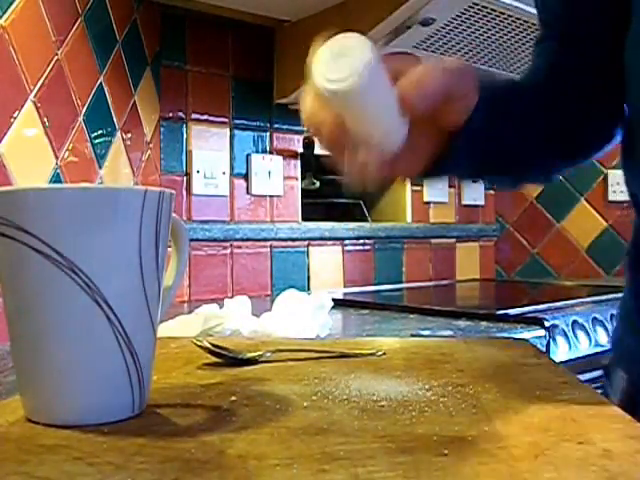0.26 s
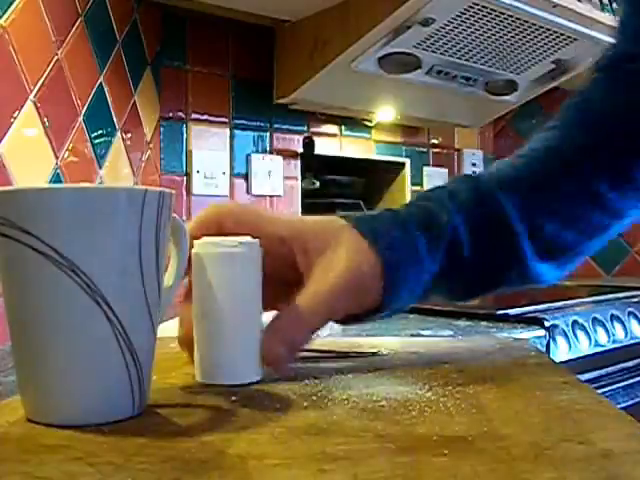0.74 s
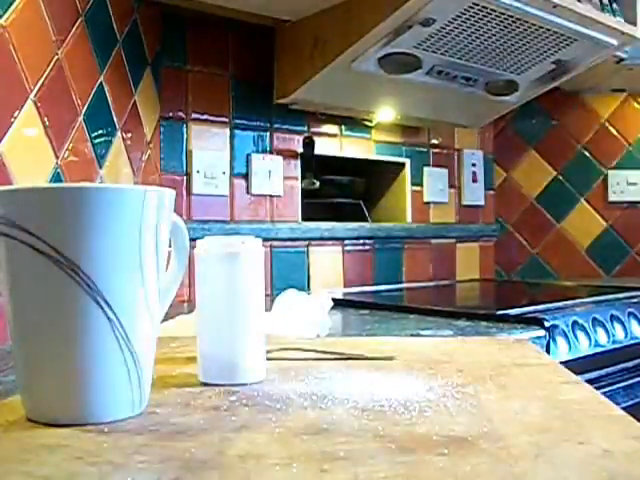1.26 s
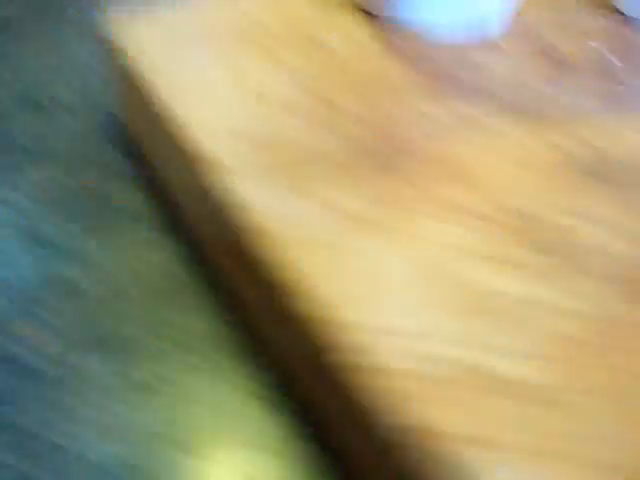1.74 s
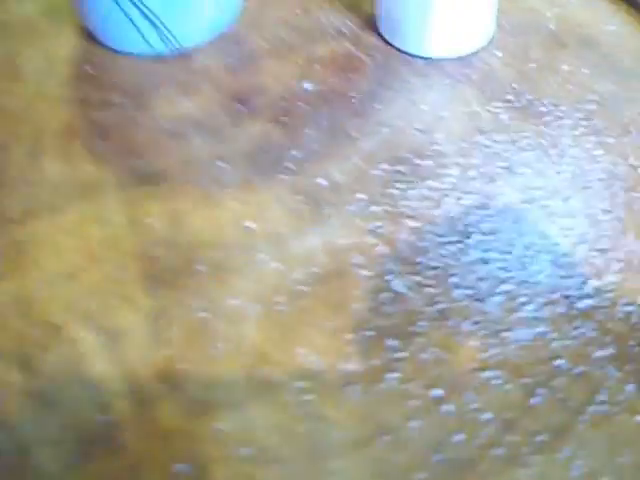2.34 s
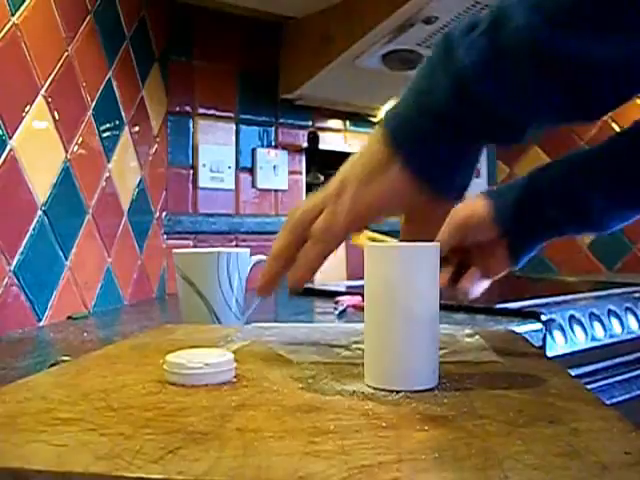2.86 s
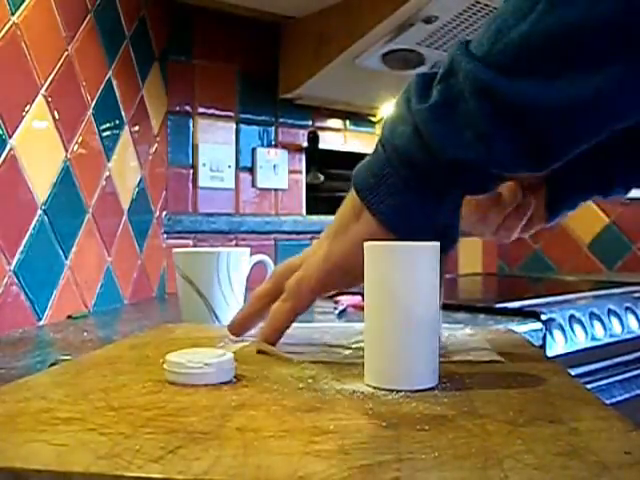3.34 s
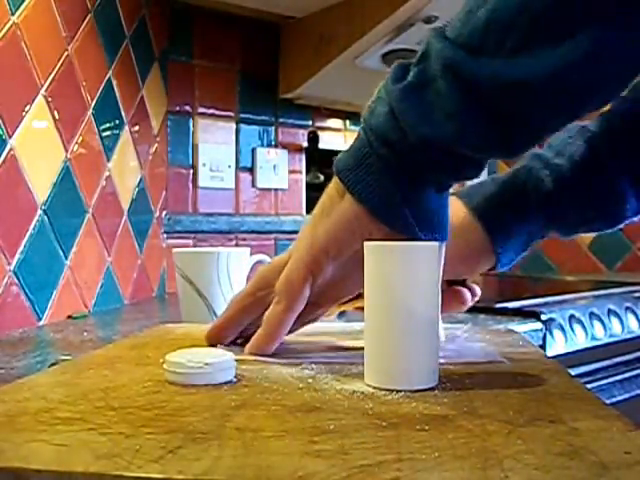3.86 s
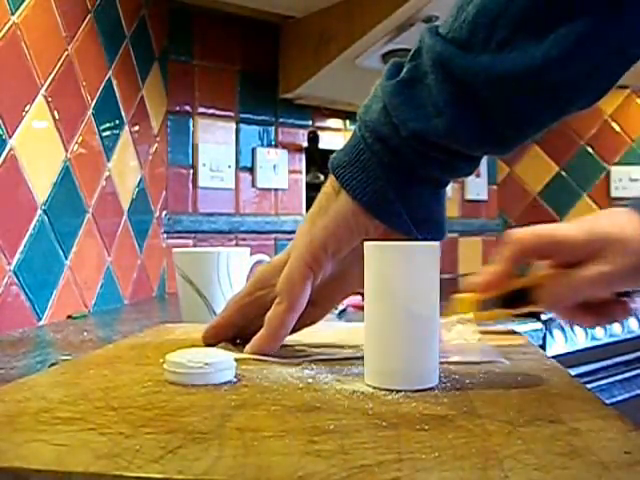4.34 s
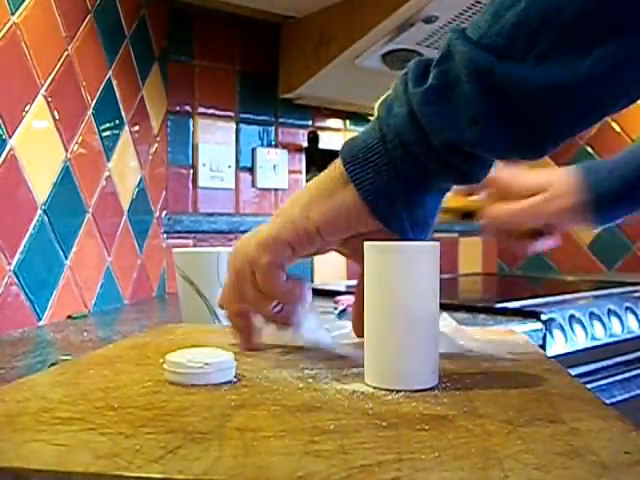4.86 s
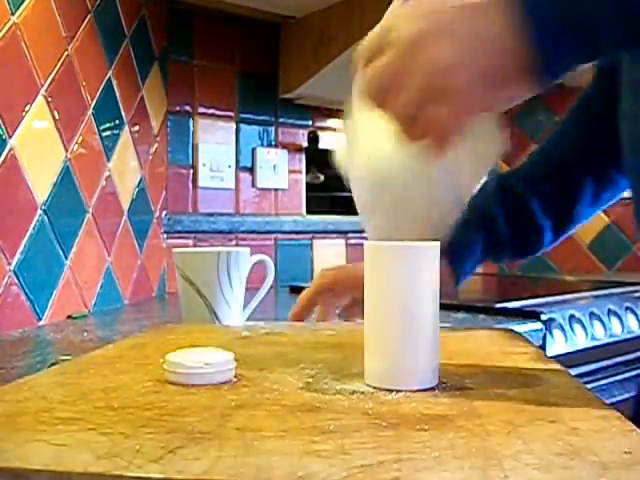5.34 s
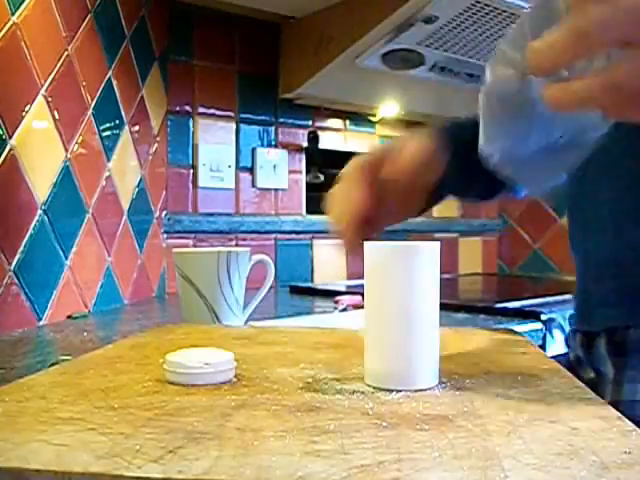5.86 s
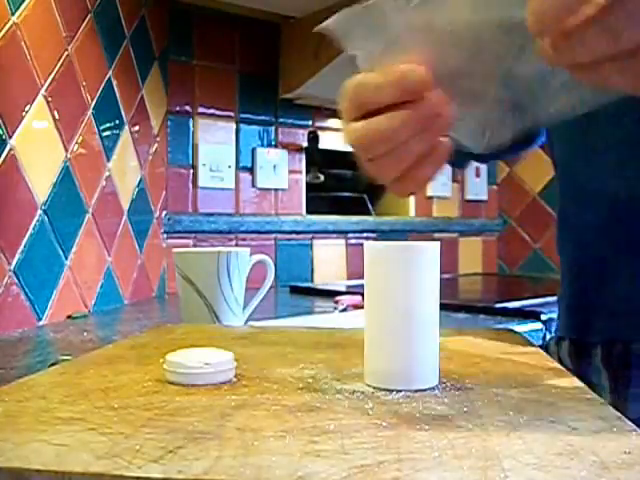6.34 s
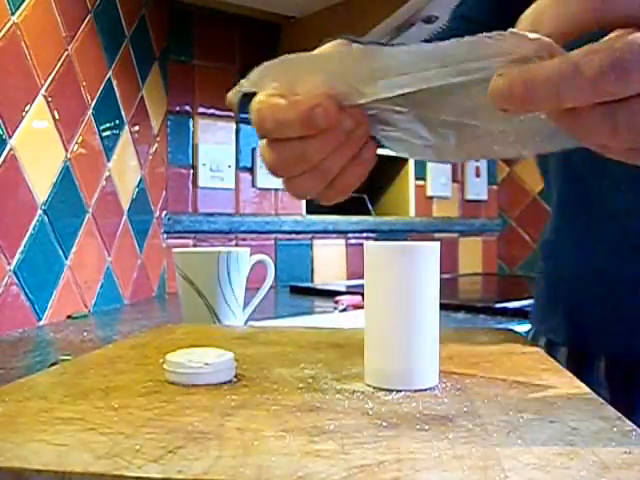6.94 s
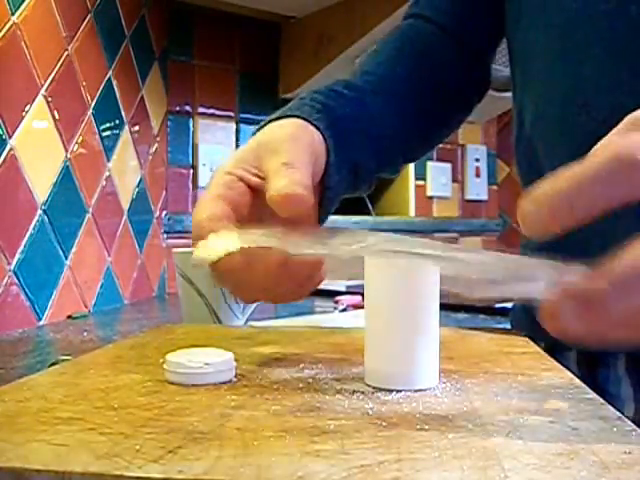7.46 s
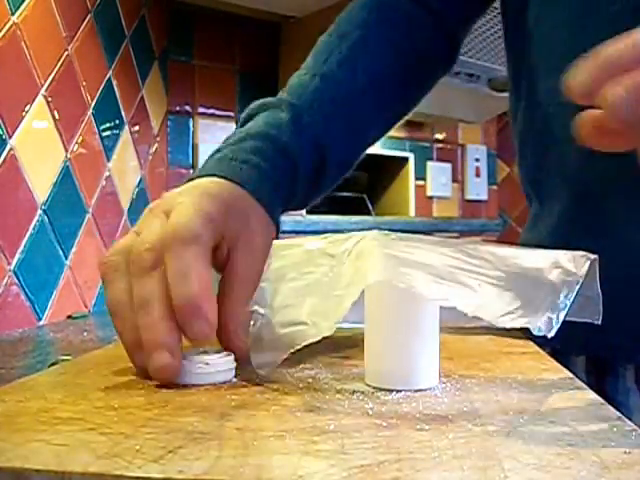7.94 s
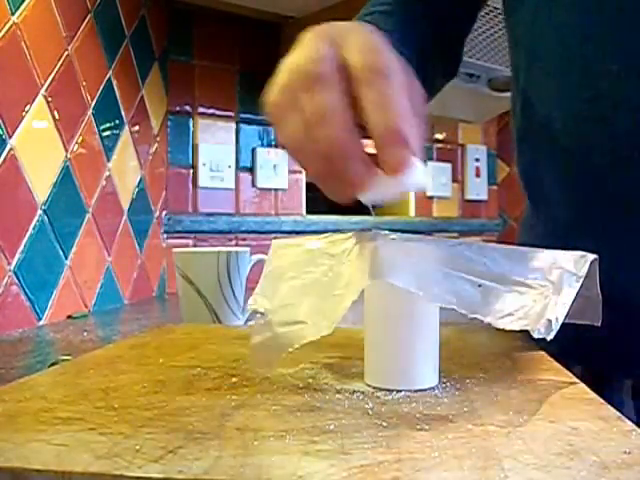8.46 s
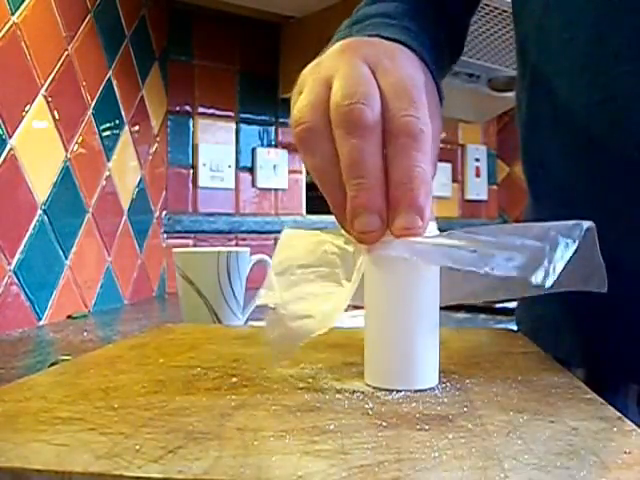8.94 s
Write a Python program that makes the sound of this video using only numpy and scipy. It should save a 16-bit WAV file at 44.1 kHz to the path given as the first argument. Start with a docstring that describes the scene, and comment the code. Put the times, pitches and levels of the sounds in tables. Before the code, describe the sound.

Shaker hiss and knock, creaky handling bumps, ratcheting blade snaps, a gritty slice, a knife clatter, crackling plastic film and a squeaky lid in a tiled kitchen.

```python
"""Cling film crackles, tears off a wooden board and flaps as it is draped over a salt shaker in a tiled kitchen.
Before that, salt slides in the shaker as tiny clicks, the shaker knocks on the ringing board, and a camera case
creaks as it is picked up. After a short silence, a second scene starts: a craft knife ratchets open with ringing
snaps, slices the film with a gritty hiss, and drops on the worktop. The film is peeled up in small slips and tugs
and draped, then a hollow lid scrapes and squeaks off the board and is pressed on. Room noise runs underneath."""
import sys
import numpy as np
from scipy import signal
from scipy.fft import rfft, irfft
from scipy.io import wavfile
from scipy.ndimage import uniform_filter1d

SR = 44100
rng = np.random.default_rng(int(sys.argv[2]) if len(sys.argv) > 2 else 0)


def waveform_to_disk(signal):
    """Save audio, clipped to [-1, 1], as 16-bit WAV at the path in sys.argv[1]."""
    frames = np.transpose(np.atleast_2d(signal))
    scaled = np.clip(frames, -1, 1) * 32767
    samples = np.round(scaled).astype(np.int16)
    wavfile.write(sys.argv[1], SR, samples)


N = 405279
TIME = np.arange(N) / SR   # seconds
SILENCE_START_S, SILENCE_END_S = 2.904, 2.921   # the gap between the two scenes


def from_db(db):
    """Turn decibels into a plain multiplier."""
    return 10 ** (np.asarray(db) / 20)


def unit_power(x):
    """Scale a signal so that its average power is 1."""
    return x / np.sqrt(np.mean(x ** 2) + 1e-20)


def level_curves(rows):
    """Join the rows into one gain curve per dB column, fading to near silence outside them."""
    start, *columns = np.transpose(rows)
    edged = np.r_[start[0] - .03, start, start[-1] + .03]
    curves = []
    for column in columns:
        db = np.interp(TIME, edged, np.r_[-100, column, -100])
        curves.append(from_db(db))
    return curves


def drift(rate):
    """Wander smoothly and randomly, with new targets "rate" times a second and unit power."""
    targets = rng.standard_normal(8192)
    return unit_power(np.interp(TIME * rate, np.arange(len(targets)), targets))


def colour(x, points, size=4096):
    """Filter a sound to a given spectrum, adding no sound before its cause (minimum phase)."""
    hz, db = np.transpose(points)
    grid = np.maximum(np.arange(size // 2 + 1) * SR / size, 1)
    spectrum_db = np.interp(np.log(grid), np.log(hz), db)
    # folding the cepstrum forward in time makes the filter minimum-phase
    cepstrum = irfft(np.log(from_db(spectrum_db)))
    cepstrum[1:size // 2] *= 2
    cepstrum[size // 2 + 1:] = 0
    response = irfft(np.exp(rfft(cepstrum)))
    # unit power gain: only the shape of the spectrum matters, not its height
    return signal.oaconvolve(x, response / np.linalg.norm(response))[:N]


def resonate(x, modes):
    """Ring side-by-side resonances; a narrower width rings longer."""
    out = 0
    for hz, width, db in modes:
        r = np.exp(-np.pi * width / SR)
        feedback = [1, -2 * r * np.cos(2 * np.pi * hz / SR), r * r]
        ring = signal.lfilter([1, 0, -1], feedback, x + 1e-18)
        out = out + from_db(db) * (1 - r * r) / 2 * ring   # the dB is the gain on top
    return out


def grains(per_s, spread_db, clump_db, clump_rate):
    """Scatter tiny clicks of uneven size that come in clumps, with unit power."""
    sizes = from_db(spread_db * np.minimum(rng.exponential(1, N), 4)) * rng.choice([-1, 1], N)
    clicks = sizes * (rng.random(N) < per_s / SR)
    return unit_power(clicks * from_db(clump_db * drift(clump_rate)))


def contacts(rows, rise_s):
    """Make each contact a brief noisy chatter of micro-impacts that dies away."""
    force, t = np.zeros(N), TIME[:SR // 8]
    for start, db, decay in rows:
        shape = (1 - np.exp(-t / rise_s)) ** 2 * np.exp(-t / max(decay, 1e-4))
        at = round(start * SR)
        force[at:at + len(t)] += (from_db(db) * shape / shape.max())[:N - at]
    return force * rng.standard_normal(N)


def alike(rows, decay_s):
    """Give contacts of one kind the same decay time."""
    return [(start, db, decay_s) for start, db, *_ in rows]


def strokes(rows, attack_s, release_s):
    """Let each movement swell, hold and die away; one gain curve per dB column."""
    power = 0
    for start, hold, *levels in rows:
        before = np.maximum(start - TIME, 0) / attack_s
        after = np.maximum(TIME - start - hold, 0) / release_s
        shape = np.exp(-2 * np.minimum(before + after, 20))
        power = power + np.outer(from_db(levels) ** 2, shape)
    return np.sqrt(power)


# Steady kitchen air. Each row: time in seconds, level in dB.
AIR_LEVELS = [(0, -49.5), (2.9, -52.5), (2.93, -49.5), (9.19, -50.5)]
# Tone of that air. Each row: frequency in Hz, relative level in dB per Hz.
AIR_COLOUR = [(25, -1.5), (100, 2), (240, 2.5), (330, -0.5), (440, 3), (600, -5), (1000, -8), (3000, -11),
              (8000, -17.5), (15000, -17.5)]
# Faint electrical whine. Each row: pitch in Hz, level in dB.
WHINE_TONES = [(5362, -65.5), (5674, -66)]


def background():
    """Filtered noise makes the kitchen air; steady sine tones make a thin whine in the second scene."""
    level, = level_curves(AIR_LEVELS)
    whine = 0
    for hz, db in WHINE_TONES:
        whine = whine + from_db(db) * np.sqrt(2) * np.sin(2 * np.pi * hz * TIME)
    air = level * colour(rng.standard_normal(N), AIR_COLOUR)
    return air + whine * (TIME > SILENCE_END_S)


# Shaker strokes with salt sliding inside. Each row: start in seconds, hold in seconds, relative level in dB.
SALT_STROKES = [(.025, 0.013, -40.5), (.168, 0.017, -42), (.316, 0.028, -48), (.45, 0.17, -52),
                (.548, 0.025, -42.5)]
# Tone of salt on plastic. Each row: frequency in Hz, relative level in dB per Hz.
SALT_TONE = [(300, -20), (1000, -17), (2000, -8), (3000, 0), (4000, 0), (7000, -4.5), (9000, -14),
             (15000, -15.5)]


def shaker():
    """Salt slides along the plastic wall on every stroke, as a dense stream of tiny clicks."""
    stroke, = strokes(SALT_STROKES, attack_s=0.012, release_s=0.01)
    salt = stroke * grains(per_s=9000, spread_db=2.0, clump_db=1.5, clump_rate=29)
    return from_db(8) * colour(salt, SALT_TONE)


# Shaker knocking on the board, a ratchet jolt, then the knife dropping on the worktop.
# Each row: start in seconds, relative peak in dB, decay in seconds.
HARD_KNOCKS = [(.8812, -9.5, 0.0041), (.897, -17.5, 0.0035), (3.3455, -9.5, 0.0019), (5.204, -0.5, 0.0069)]
# Shaker settling and sliding. Each row: start in seconds, hold in seconds, relative level in dB.
SHAKER_SLIDES = [(.935, 0.05, -43), (.995, 0.027, -36)]
# Fingers and lid tapping the board. Each row: start in seconds, relative peak in dB.
BOARD_TAPS = [(7.998, -26), (8.055, -34), (8.148, -23), (8.237, -31.5), (8.442, -20)]
# Tone of hard knocks. Each row: frequency in Hz, relative level in dB per Hz.
HARD_KNOCK_COLOUR = [(40, -4.5), (105, -13.5), (190, -4.5), (700, 0.5), (1300, -3.5), (3200, -3),
                     (7000, -11.5), (15000, -12)]
# Tone of soft taps. Each row: frequency in Hz, relative level in dB per Hz.
SOFT_TAP_COLOUR = [(40, -7), (110, 4.5), (190, 8), (450, -7.5), (900, -9), (3000, -21.5), (8000, -27),
                   (15000, -24)]
# Body resonances shared by knocks and taps. Each row: frequency in Hz, width in Hz, relative level in dB.
BODY_MODES = [(60.4, 7.6, 20.5), (158.5, 21, 7.5), (290, 24, -1), (368, 16, 8), (468, 8.3, 13),
              (598, 31, -3.5), (734, 28, 1), (1030, 31, 3)]


def knocks_and_taps():
    """Hard knocks, a short scrape and soft taps share one set of body resonances."""
    slide, = strokes(SHAKER_SLIDES, attack_s=.012, release_s=0.019)
    judder = grains(per_s=1200, spread_db=3, clump_db=2, clump_rate=80)
    hits = from_db(-4.0) * contacts(HARD_KNOCKS, rise_s=0.0013)
    knocks = colour(hits + from_db(0.5) * slide * judder, HARD_KNOCK_COLOUR)
    tap_force = contacts(alike(BOARD_TAPS, decay_s=0.0051), rise_s=0.0013)
    taps = from_db(-11.5) * colour(tap_force, SOFT_TAP_COLOUR)
    return knocks + taps + from_db(-3.5) * resonate(knocks + taps, BODY_MODES)


# Soft, low thuds of camera and board. Each row: start in seconds, relative peak in dB, decay in seconds.
LOW_THUDS = [(.886, -34, 0.048), (1.448, -23, 0.011), (1.525, -22, 0.031), (1.636, -20, 0.0091),
             (1.715, -34.5, 0.064), (5.503, -26, 0.0083), (5.770, -28, 0.017)]
# Tone of the thuds. Each row: frequency in Hz, relative level in dB per Hz.
LOW_THUD_COLOUR = [(20, -2), (40, -12), (65, 3), (100, -23), (200, -18), (600, -26)]


def thuds():
    """Slow pushes reach the microphone through solid material, so mostly low tones are left."""
    return from_db(-5.0) * colour(contacts(LOW_THUDS, rise_s=0.0016), LOW_THUD_COLOUR)


# Fingers rubbing the camera case. Each row: start in seconds, hold in seconds, relative rub level in dB,
# relative level driving the case's ring in dB.
CASE_RUBS = [(1.07, .26, -49.5, -53), (1.17, 0.082, -44, -49), (1.36, 0.011, -35, -48),
             (1.45, .03, -51, -46), (1.495, 0.041, -28, -23.5), (1.56, 0.036, -41, -51),
             (1.63, 0.032, -21.5, -25.5), (1.68, 0.2, -41.5, -45), (1.992, 0.08, -33.5, -34),
             (2.15, .07, -45, -50)]
# Creaks of the case. Each row: start in seconds, relative peak in dB, ring in dB relative to the creak.
CASE_CREAKS = [(1.3452, -5, -3.5), (1.3856, -9.5, -10), (1.4345, -6, -9), (1.49, -8, -4.5),
               (1.5326, -8.5, -7), (1.6314, -15.5, -5), (1.657, -14.5, -1), (1.8538, -19.5, -1.5),
               (1.9349, -25.5, 12), (2.214, -36, -10), (2.2752, -28.5, -0.5), (2.299, -40, -6),
               (2.419, -43.5, -5), (2.507, -47, -6), (2.859, -23.5, -9)]
# Palm bumping the camera. Each row: start in seconds, relative peak in dB.
PALM_BUMPS = [(1.3425, -8.5), (1.3865, -30), (1.435, -24), (1.4875, -12), (1.501, -10.5), (1.512, -11.5),
              (1.529, -11), (1.550, -25.5), (1.581, -18)]
# The camera is heaved up and its body rumbles. Each row: start in seconds, hold in seconds, relative level in dB.
CAMERA_HEAVE = [(1.495, 0.032, -21)]
# Tone of rubs and creaks. Each row: frequency in Hz, relative level in dB per Hz.
RUB_COLOUR = [(200, -18.5), (600, -5.5), (1100, 2), (1800, 1), (2850, 1), (3400, 6), (4200, 7), (6500, 1),
              (8300, 0.5), (15000, -6.5)]
# Resonances of the case. Each row: frequency in Hz, width in Hz, gain in dB.
CASE_RESONANCES = [(2780, 295, 11.5), (2740, 100, 6), (1020, 110, -50)]
# Tone of bumps on the camera. Each row: frequency in Hz, relative level in dB per Hz.
BUMP_COLOUR = [(25, -9), (60, -9), (130, 0), (200, 1), (300, 0.5), (450, 3), (650, -7), (1100, -6.5),
               (2000, -21)]


def camera():
    """Fingers rub and creak on the ringing case, which carries bumps straight to the microphone."""
    rumble, = strokes(CAMERA_HEAVE, attack_s=0.043, release_s=0.021)
    rub, ring_drive = strokes(CASE_RUBS, attack_s=0.019, release_s=0.017)
    friction = grains(per_s=1800, spread_db=3.2, clump_db=2, clump_rate=140)
    creaks = from_db(0.5) * contacts(alike(CASE_CREAKS, decay_s=0.0028), rise_s=0.00038)
    ring_rows = [(start, db + ring_db) for start, db, ring_db in CASE_CREAKS]
    ring_hits = from_db(8.5) * contacts(alike(ring_rows, decay_s=0.0018), rise_s=0.00022)
    body = contacts(alike(PALM_BUMPS, decay_s=0.0059), rise_s=0.00058) + rumble * friction
    surface = colour(creaks + rub * friction, RUB_COLOUR)
    ringing = resonate(ring_hits + ring_drive * friction, CASE_RESONANCES)
    return surface + ringing + colour(body, BUMP_COLOUR)


# The film is smoothed, lifted, stretched and draped. Each row: start in seconds, hold in seconds,
# relative rustle level in dB, relative flapping level in dB.
FILM_HANDLING = [(2.94, 0.068, -53, -67), (3.11, 0.068, -37, -53.5), (3.86, 0.058, -48, -48),
                 (4.78, 0.26, -42.5, -65), (4.92, 0.092, -37, -61), (5.05, 0.12, -40.5, -54.5),
                 (6.09, 0.068, -42.5, -66), (6.165, 0.025, -50, -45.5), (6.25, 0.024, -41, -57),
                 (6.32, 0.021, -30, -39.5), (6.365, 0.14, -36.5, -50.5), (6.53, .16, -42.5, -56),
                 (6.74, 0.15, -45, -55), (6.96, 0.026, -43, -40), (7.03, 0.15, -51.5, -60),
                 (7.2, .08, -45, -54.5), (7.32, .15, -48, -64), (7.5, 0.21, -51.5, -54),
                 (8.23, 0.014, -39.5, -44.5), (8.79, 0.21, -53, -54), (8.85, 0.0072, -35.5, -52),
                 (8.99, 0.038, -36.5, -52), (9.07, 0.033, -48.5, -51)]
# Creases snapping. Each row: start in seconds, relative peak in dB.
CREASE_SNAPS = [(4.2209, -13.5), (4.2973, -3.5), (4.3664, -16), (4.5874, -8), (4.9886, -35), (5.7703, -19),
                (6.0561, -23.5), (6.3265, -9), (6.4764, -16), (6.6094, -23.5), (7.953, -37), (8.6375, -37),
                (8.9319, -23), (9.1723, -30)]
# Tone of crackling film, also used in peeling. Each row: frequency in Hz, relative level in dB per Hz.
CRACKLE_COLOUR = [(400, -14.5), (1000, -5.5), (2000, -0.5), (3200, 4.5), (4400, 4), (7000, -0.5),
                  (9000, -8.5), (15000, -10)]
# Tone of flapping film, also used in peeling. Each row: frequency in Hz, relative level in dB per Hz.
FLAPPING_COLOUR = [(30, -54.5), (90, -7.5), (175, 6), (330, 5.5), (480, -5), (800, -5.5), (2000, -12.5)]


def film():
    """Thin film crackles in tiny clicks, snaps at its creases and flaps as it is moved."""
    rustle, flap = strokes(FILM_HANDLING, attack_s=0.021, release_s=0.018)
    crackle = rustle * grains(per_s=3200, spread_db=4.4, clump_db=1.4, clump_rate=110)
    flapping = flap * grains(per_s=2500, spread_db=2, clump_db=1, clump_rate=50)
    snaps = contacts(alike(CREASE_SNAPS, decay_s=.0035), rise_s=0.0002)
    bright = colour(from_db(-1.5) * crackle + from_db(-9.0) * snaps, CRACKLE_COLOUR)
    return bright + from_db(2) * colour(flapping, FLAPPING_COLOUR)


# Slider jumping its notches. Each row: start in seconds, relative level in dB.
NOTCH_SNAPS = [(3.2705, -19.5), (3.3465, 2.5), (3.3555, -2.5), (3.388, 2), (3.4255, 7.5), (3.454, 4),
               (3.4772, 4), (3.5005, 2.5), (3.5222, 4), (3.547, 3.5), (3.5935, 8), (3.938, -21)]
# Knife lifting off the board, then clattering down. Each row: start in seconds, relative level in dB,
# chatter decay in seconds.
KNIFE_CLATTER = [(4.7208, -15, 0.0087), (5.188, 2, 0.015), (5.204, 3.5, 0.016)]
# Tone of the snaps. Each row: frequency in Hz, relative level in dB per Hz.
SNAP_COLOUR = [(100, -27.5), (900, -25), (1400, -9), (2000, 1), (3100, 2.5), (5000, -1.5), (8000, -2),
               (10000, -26), (14000, -3), (16000, -15.5)]
# Resonances of the blade. Each row: frequency in Hz, width in Hz, relative level in dB.
BLADE_MODES = [(2276, 180, -5), (2815, 180, -3), (3180, 170, -2), (4130, 550, -11.5), (7950, 94, 1),
               (8740, 170, 8.5)]
# Resonances of the hollow plastic handle. Each row: frequency in Hz, width in Hz, relative level in dB.
HANDLE_RESONANCES = [(2010, 40, -4), (2330, 140, -3)]
MODE_SCATTER_DB = 3   # spread of the drive to each blade mode, so every snap rings differently


def knife():
    """Snaps and clatter excite the blade's modes in varying strengths, and ring the hollow handle."""
    snaps = colour(contacts(alike(NOTCH_SNAPS, decay_s=0.0041) + KNIFE_CLATTER, rise_s=0.00071), SNAP_COLOUR)
    blade = 0
    for mode in BLADE_MODES:
        uneven_snaps = snaps * from_db(MODE_SCATTER_DB * drift(30))
        blade = blade + resonate(uneven_snaps, [mode])
    handle = resonate(snaps, HANDLE_RESONANCES)
    return from_db(-6) * snaps + from_db(-4) * blade + from_db(-1.5) * handle


# Pressure of the blade on its long cut, heard as hiss. Each row: time in seconds, relative level in dB.
CUT_PRESSURE = [(4.05, -57.5), (4.206, -32), (4.224, -29), (4.232, -29.5), (4.294, -26.5), (4.482, -30),
                (4.596, -22), (4.71, -35)]
# The board rumbles under the blade. Each row: start in seconds, hold in seconds, relative level in dB.
BLADE_PRESS = [(4.3, 0.43, -42.5)]
# Tone of the hiss. Each row: frequency in Hz, relative level in dB per Hz.
HISS_COLOUR = [(400, -18.5), (900, -12), (1600, -7.5), (2500, -5.5), (3300, -1), (4300, 2.5), (5400, -9),
               (6800, -1), (9000, -14.5), (15000, -15)]
# Tone of the board's rumble, also used in peeling. Each row: frequency in Hz, relative level in dB per Hz.
BOARD_RUMBLE_COLOUR = [(30, -19), (100, -23.5), (165, 3), (260, -2.5), (340, -7), (440, -1.5), (600, -5.5),
                       (2000, -58)]


def slicing():
    """The blade tip catches finely on the wood grain, hissing and rumbling the board."""
    hiss, = level_curves(CUT_PRESSURE)
    rumble, = strokes(BLADE_PRESS, attack_s=.15, release_s=0.015)
    catches = grains(per_s=9000, spread_db=3.8, clump_db=1.5, clump_rate=140)
    return from_db(0.47) * colour(hiss * catches, HISS_COLOUR) + colour(rumble * catches, BOARD_RUMBLE_COLOUR)


# Pulls that unstick the film from the board. Each row: start in seconds, hold in seconds,
# relative tearing level in dB, relative rustle level in dB, relative flapping level in dB.
PEEL_PULLS = [(5.31, 0.03, -15.5, -14, -32), (5.375, .075, -22, -26, -33),
              (5.535, 0.098, -26.5, -32.5, -32), (5.7, 0.13, -47, -28.5, -40.5),
              (5.862, 0.039, -18, -39, -33.5), (5.945, 0.049, -30.5, -39, -36.5), (6.0, .06, -40, -36, -39)]
# Stuck patches letting go. Each row: start in seconds, relative peak in dB.
PATCH_TUGS = [(5.303, -18), (5.372, -16), (5.419, -19), (5.46, -27), (5.528, -25.5), (5.57, -26.5),
              (5.600, -20.5), (5.632, -33), (5.859, -15), (5.900, -22), (5.964, -20.5)]
# Tone of tearing loose. Each row: frequency in Hz, relative level in dB per Hz.
TEAR_COLOUR = [(300, -4.5), (900, -23), (1600, -13), (2050, 1.5), (2370, 10), (2800, 0), (3400, 0.5),
               (4500, -4.5), (5500, -19), (6800, -8), (8700, -6.5), (14000, -20), (16000, -17)]


def peeling():
    """The stuck film tears loose in tiny slips and larger tugs; the taut sheet sings and drums."""
    tear, rustle, flap = strokes(PEEL_PULLS, attack_s=.008, release_s=0.029)
    tugs = contacts(alike(PATCH_TUGS, decay_s=.01), rise_s=0.0018)
    slips = grains(per_s=1300, spread_db=4, clump_db=2.8, clump_rate=80)
    crackle = rustle * grains(per_s=3500, spread_db=4.4, clump_db=1.6, clump_rate=110)
    tearing = colour(from_db(-7.0) * tear * slips + from_db(-3) * tugs, TEAR_COLOUR)
    crackling = from_db(-7.5) * colour(crackle, CRACKLE_COLOUR)
    drumming = colour(from_db(-7) * flap * slips + from_db(-9) * tugs, FLAPPING_COLOUR)
    rumble = from_db(-12) * colour(flap * slips, BOARD_RUMBLE_COLOUR)
    return tearing + crackling + drumming + rumble


# The lid is dragged off the board, catching twice. Each row: start in seconds, hold in seconds,
# relative level in dB.
LID_DRAG = [(8.152, 0.019, -40.5), (8.235, 0.025, -31)]
# Film brushing the shaker's rim. Each row: start in seconds, relative peak in dB, decay in seconds.
RIM_BRUSH = [(7.621, -35.5, 0.0066)]
# Bands of the lid scrape: the lower ones are its resonances, the two highest are added treble.
# Each row: frequency in Hz, width in Hz, relative level in dB.
SCRAPE_BANDS = [(930, 180, -8), (1460, 670, -3.5), (1950, 140, 7.5), (3800, 2100, -21.5),
                (9300, 1400, -3.5), (12600, 600, -10)]
# Resonances of the open shaker. Each row: frequency in Hz, width in Hz, relative level in dB.
RIM_RESONANCES = [(1040, 100, 7), (2070, 450, -10), (4300, 21000, -22)]
SQUEAK_HZ, SQUEAK_RISE_HZ_PER_S = 2230, 1700   # pitch at the first catch, and its steady rise


def lid_and_rim():
    """The hollow lid scrapes with a rough rising squeak; the open shaker sounds when its rim is brushed."""
    drag, = strokes(LID_DRAG, attack_s=.018, release_s=0.0098)
    hz = SQUEAK_HZ + SQUEAK_RISE_HZ_PER_S * np.clip(TIME - LID_DRAG[0][0], 0, 1)
    scrape = from_db(6.5) * drag * grains(per_s=2200, spread_db=4.5, clump_db=1.5, clump_rate=89)
    roughness = drift(260)
    squeak = from_db(-5.0) * drag * roughness * np.sin(2 * np.pi * np.cumsum(hz) / SR)
    rim = from_db(18) * resonate(contacts(RIM_BRUSH, rise_s=0.002), RIM_RESONANCES)
    return resonate(scrape, SCRAPE_BANDS) + squeak + rim


def kitchen(x, wet_db, t60=0.37, first_s=0.0027):
    """Add dense echoes of tiles and worktop, as noise that falls 60 dB in t60 seconds."""
    t = TIME[:SR // 2]
    tail = rng.standard_normal(len(t)) * from_db(-60 * t / t60) * (t > first_s)
    return x + from_db(wet_db) * signal.oaconvolve(x, tail / np.linalg.norm(tail))[:N]


def scene():
    """Mix all sources at one small microphone; in the first scene the left side lags a little."""
    handling = shaker() + knocks_and_taps() + slicing() + film() + peeling() + lid_and_rim()
    sound = kitchen(handling, wet_db=-7.0)
    sound = sound + kitchen(knife(), wet_db=-7.5)
    sound = sound + kitchen(camera(), wet_db=-16)   # weaker echoes
    sound = sound + thuds() + background()
    late = np.r_[np.zeros(4), sound[:-4]]   # 4 samples late
    left = np.where(TIME < SILENCE_START_S, late, sound)
    return np.array([left, sound])


def gain_control(x, limit_db=-10.0, release_db_per_s=44, attack_s=0.029):
    """Let loud sounds pull the gain down quickly; it creeps back up."""
    level = 10 * np.log10(np.abs(uniform_filter1d(x[1] ** 2, size=128)) + 1e-12)   # right side steers both
    recovery = release_db_per_s * TIME
    over = np.maximum.accumulate(np.maximum(level - limit_db, 0) + recovery) - recovery
    keep = np.exp(-1 / (attack_s * SR))
    reduction_db = signal.lfilter([1 - keep], [1, -keep], over)
    return x * from_db(-reduction_db)


CUTOFF_HZ = 15800   # almost nothing passes above this


def record(dry):
    """Apply gain control, overload, the silence between scenes, a treble dip and the band limit."""
    clipped = np.clip(gain_control(dry), -.85, .85)
    loud = clipped * ((TIME < SILENCE_START_S) | (TIME > SILENCE_END_S))
    notch = signal.butter(2, [9000, 12900], "bandstop", fs=SR, output="sos")
    dipped = signal.sosfilt(notch, loud) + from_db(-18.5) * loud   # a little leaks past the dip
    band_limit = signal.ellip(10, .2, 70, CUTOFF_HZ, fs=SR, output="sos")
    return signal.sosfilt(band_limit, dipped)


dry = scene()
out = record(dry)
waveform_to_disk(out)
```